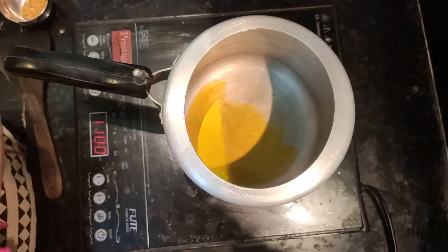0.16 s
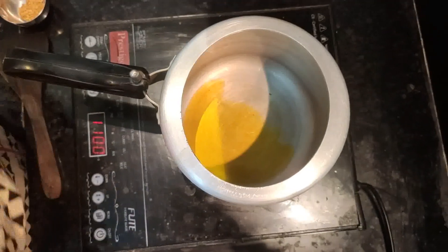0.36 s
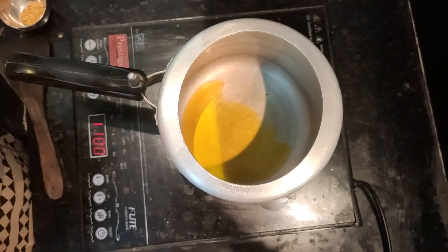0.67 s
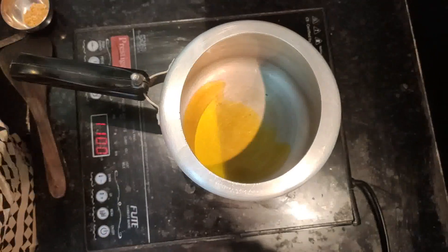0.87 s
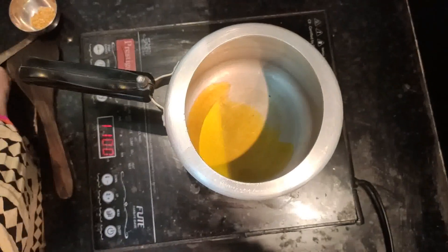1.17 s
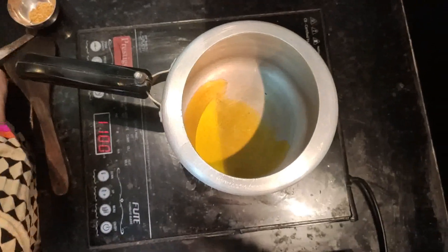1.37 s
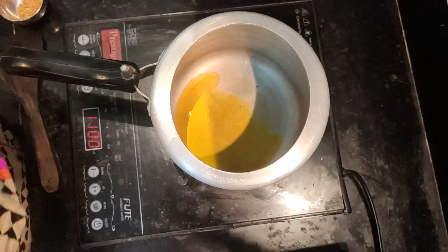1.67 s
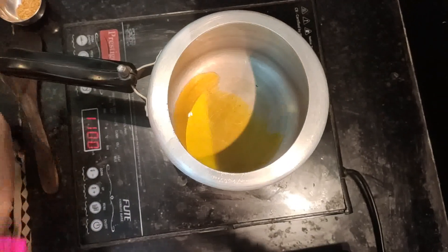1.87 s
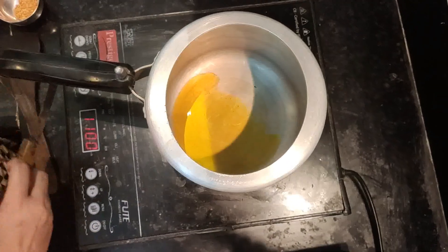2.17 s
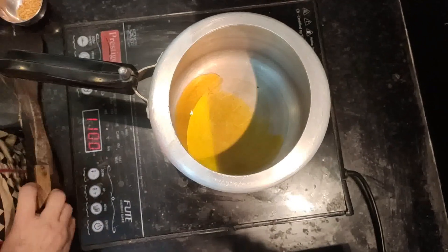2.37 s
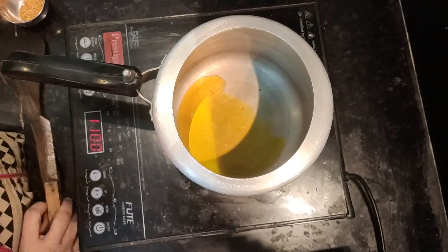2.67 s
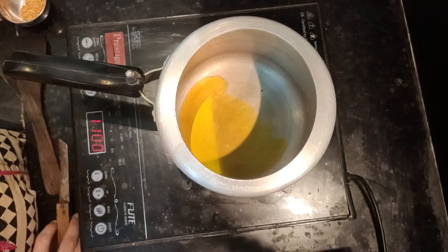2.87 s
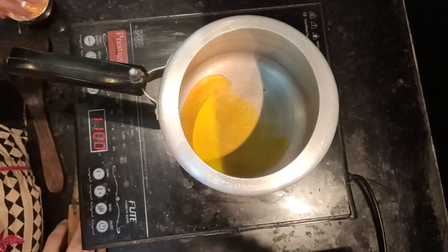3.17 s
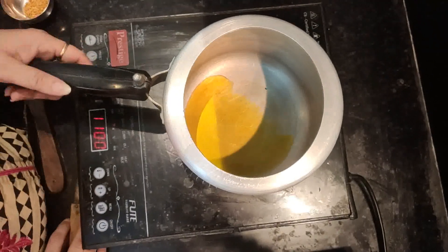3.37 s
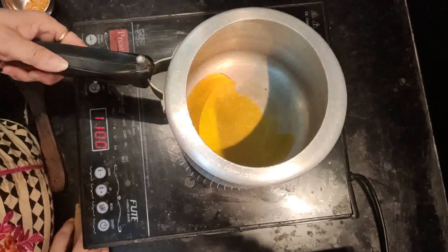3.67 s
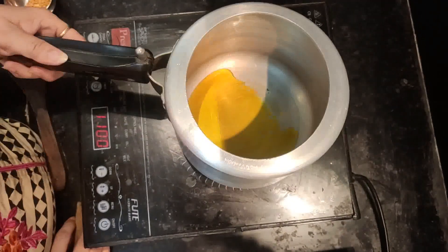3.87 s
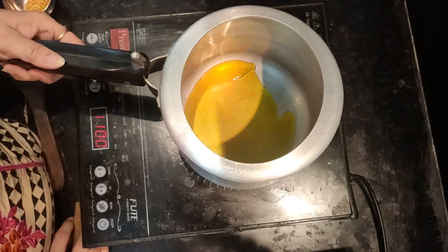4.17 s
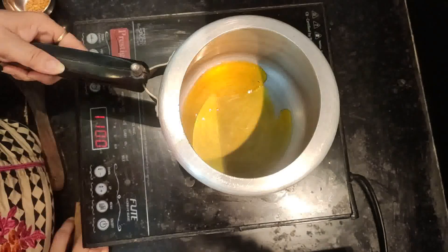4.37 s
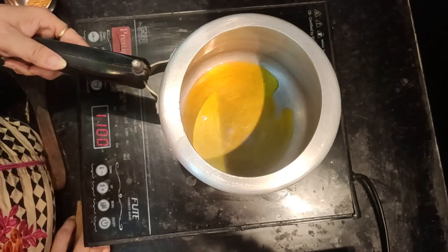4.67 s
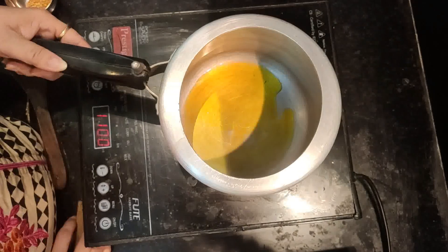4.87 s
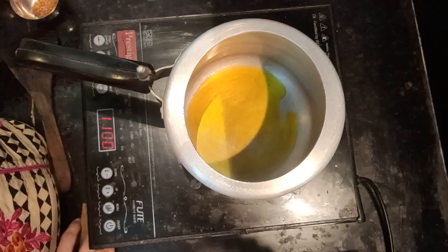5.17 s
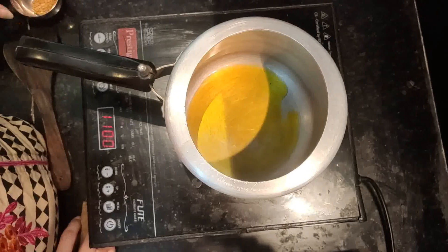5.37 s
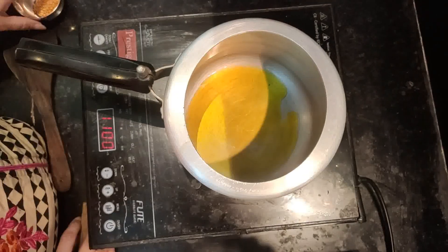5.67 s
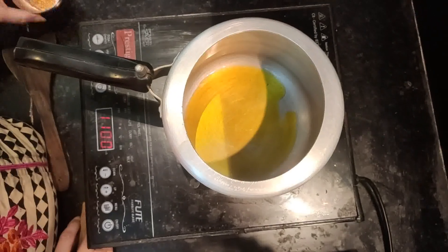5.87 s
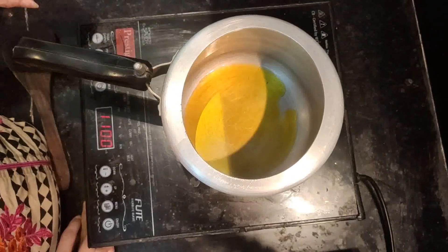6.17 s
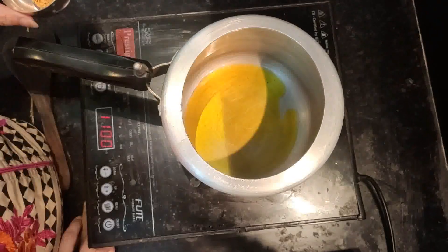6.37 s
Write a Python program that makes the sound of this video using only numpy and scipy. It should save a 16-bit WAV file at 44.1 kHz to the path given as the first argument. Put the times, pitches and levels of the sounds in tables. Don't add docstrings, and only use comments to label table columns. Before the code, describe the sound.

An induction cooktop runs throughout: rushing fan air, a steady low blade tone and slowly swelling hum, with faint high fizzing from the pot. A spoon taps near one second, a knife knocks hard at two, bangles clink at two and a half, then a ring taps. A hand rubs the handle, and the fizz stops while the pot is lifted. Close stereo pickup in a small hard kitchen.

```python
import sys
import numpy as np
from scipy import signal
from scipy.fft import rfft, irfft
from scipy.io import wavfile
from scipy.ndimage import uniform_filter1d

SR = 44100
rng = np.random.default_rng(int(sys.argv[2]) if len(sys.argv) > 2 else 0)


def dump(signal):
    limited = np.clip(np.atleast_2d(signal).T, -1, 1)
    pcm = np.round(limited * 32767).astype(np.int16)
    wavfile.write(sys.argv[1], SR, pcm)


def rack_gain(trim_db):
    fader = np.asarray(trim_db, float)
    return 10 ** (fader / 20)


N = 287973

# [f/Hz, likeness from 0 to 1]
LIKENESS = [(40, 0.74), (130, 0.97), (250, 0.92), (400, 0.98), (520, 0.47), (700, 0.41), (1310, 0.074),
            (2800, 0.073), (13000, 0)]


def evened(x):
    return x / np.sqrt(np.mean(x ** 2) + 1e-20)


def read(points, hz):
    f, value = np.transpose(points)
    return np.interp(np.log(hz + 1), np.log(f + 1), value)


def add(mix, s, sound):
    part = mix[:, round(s * SR):][:, :sound.shape[1]]
    part += sound[:, :part.shape[1]]


def wavering(t, db, top_hz):
    coarse = t[::441]
    waves = [np.sin(2 * np.pi * (f * coarse + rng.random())) / np.sqrt(f)
             for f in np.geomspace(.2, top_hz, num=24)]
    return rack_gain(db * np.interp(t, coarse, evened(sum(waves))))


def humps(modes, hz):
    return sum(rack_gain(db) ** 2 / (1 + (2 * (hz - f) / width) ** 2) for f, width, db in modes)


def alike(pair, hz):
    same = np.clip(read(LIKENESS, hz), -1, 1)
    return np.array([pair[0], same * pair[0] + np.sqrt(1 - same ** 2) * pair[1]])


def hiss(gain, same, patchy_db, size):
    # [f/Hz, left over right level/dB]
    lean_points = [(60, 0.5), (230, 2.5), (890, 0), (3420, 0.5), (13200, 1.5)]
    hz, frames = np.fft.rfftfreq(size, 1 / SR)[:, None], 4 * N // size + 5
    a, b, c, d, patches = rng.standard_normal((frames, len(hz), 5)).T
    patches = uniform_filter1d(patches, size=size // 100, axis=0)
    patches = evened(uniform_filter1d(patches, size=8, axis=1))
    left, lean = a + 1j * b, rack_gain(read(lean_points, hz) / 2)
    shift = np.exp(2j * np.pi * hz * 5 / SR)
    right = same * left * shift + np.sqrt(1 - same ** 2) * (c + 1j * d)
    spectra = np.array([left * lean, right / lean]) * gain * rack_gain(patchy_db * patches)
    return evened(signal.istft(spectra, nperseg=size, noverlap=3 * size // 4)[1][:, :N])


def kitchen(x):
    # [f/Hz, time to fall by 60 dB/s]
    fading = [(300, 0.24), (2000, 0.5), (6000, 0.37), (12000, 0.29)]
    taps = np.zeros((2, SR // 2))
    slots = np.arange(120, SR // 2 - 20, 20)
    at = slots + rng.integers(0, 20, (2, len(slots)))
    np.put_along_axis(taps, at, rng.choice([-1., 1.], at.shape), 1)
    hz, t, z = signal.stft(taps, SR, nperseg=256)
    hz = hz[:, None]
    tail = signal.istft(alike(z, hz) * rack_gain(-60 * t / read(fading, hz)), SR, nperseg=256)[1]
    return signal.fftconvolve(x.mean(0)[None], tail / np.linalg.norm(tail[0]), axes=1)[:, :N]


def hum():
    # [f/Hz, level/dB, wavering/dB]
    steady = [
        (20.5, -59, 3.5),
        (99.87, -54.3, .5),
    ]
    # [t/s, f/Hz]
    near_motor = [
        (0, 103.68),
        (3.4, 103.68),
        (3.9, 103.4),
        (4.7, 104.02),
        (6.53, 104.02),
    ]
    # [middle t/s, length/s, level/dB]
    swells = [
        (.35, 2.3, -54.5),
        (2.5, 2.2, -50),
        (3.5, 1.3, -49.5),
        (4.85, 2.0, -53),
        (6.55, 1.2, -58),
    ]
    t = np.arange(N) / SR
    throb = rack_gain(-63)
    for s, length, db in swells:
        throb = throb + rack_gain(db) * np.cos(np.pi * np.clip((t - s) / length, -.5, .5)) ** 2
    tones = throb * np.sin(2 * np.pi * 49.17 * t)
    turns = np.cumsum(np.interp(t, *np.transpose(near_motor))) / SR + .56
    tones += rack_gain(-59 + 0.11 * t) * np.cos(2 * np.pi * turns)
    for hz, db, waver_db in steady:
        tones += rack_gain(db) * wavering(t, waver_db, top_hz=2.37) * np.cos(2 * np.pi * hz * t)
    return np.sqrt(2) * tones * rack_gain(np.c_[[.9, -.9]])


def fan():
    # [t/s, f/Hz]
    blade_pitch = [
        (0, 281.63),
        (3.5, 281.63),
        (4.8, 281.57),
        (6.53, 281.44),
    ]
    # [multiple of the blade pitch, left level/dB, right level/dB, wavering/dB]
    blade_tones = [(1, -42.7, -44, .5), (2, -62, -66, 2.), (3, -67, -67, 2.), (4, -66, -63.5, 2.)]
    # [f/Hz, level/dB in each Hz]
    air = [(15, -6), (32, -12), (60, -11), (90, -8.5), (130, -13), (220, -23), (270, -5.5), (400, -10.5),
           (500, -17), (900, -13.5), (1500, -15), (2200, -18.5), (5000, -27.5), (12500, -39)]
    # [f/Hz, width/Hz, level over the rush/dB]
    housing = [(168, 4.5, 12), (192.5, 8, 12.5), (341, 10.7, 8.5), (431.6, 53, 9.5), (592, 20.6, 10.5),
               (737.4, 17.5, 7.5), (1016, 57, 7.5), (1353, 43, 9.5), (1920, 230, 1), (2500, 39, -27)]
    t, hz = np.arange(N) / SR, np.fft.rfftfreq(4096, 1 / SR)[:, None]
    gain = rack_gain(read(air, hz)) * np.sqrt(1 + humps(housing, hz))
    out = rack_gain(-41.5) * hiss(gain, np.clip(read(LIKENESS, hz), -1, 1), patchy_db=1.07, size=4096)
    turns = np.cumsum(np.interp(t, *np.transpose(blade_pitch))) / SR
    for k, left_db, right_db, waver_db in blade_tones:
        tone = np.sin(2 * np.pi * k * turns + np.c_[[0, .13]])
        out += np.sqrt(2) * rack_gain(np.c_[[left_db, right_db]]) * wavering(t, waver_db, top_hz=6.6) * tone
    return out


def pot():
    # [f/Hz, width/Hz, level/dB]
    parts = [
        [(11300, 210, -5), (11440, 490, -3), (12530, 580, 1)],
        [(4160, 890, 0), (5500, 1800, -27), (7100, 300, -1.5), (7530, 80, -0.5), (7840, 440, -2),
         (9000, 1300, -8.5)],
        [(10670, 510, 0), (9800, 1500, -6)],
    ]
    # [t/s, level/dB]
    coil = [
        (0, 2.5),
        (.9, 7),
        (1.4, 1.5),
        (3.4, 9),
        (3.9, -2.5),
        (4.04, 4),
        (5.03, 0),
        (5.85, -12),
        (6.53, -0.5),
    ]
    # [level at 0 dB coil power/dB, share of a power change followed, extra while rocking
    # (reversed at rest)/dB]
    coupling = [
        (-60, 0.68, -4.5),
        (-62.5, .4, -2),
        (-74.5, .3, 11.5),
    ]
    lift_s, set_s, switch_s, rock_s = 4.055, 5.015, 0.017, .65
    hz = np.fft.rfftfreq(1024, 1 / SR)[:, None]
    t = np.arange(4 * N // 1024 + 5) * 256 / SR
    coil_db = np.interp(t, *np.transpose(coil))
    lifted = np.clip(np.minimum(t - lift_s, set_s - t) / switch_s + .5, 0, 1)
    rocking = np.sin(np.pi * np.clip((t - set_s) / rock_s, 0, 1.5))
    power = 0
    for modes, (db, share, rock_db) in zip(parts, coupling):
        colour = humps(modes, hz)
        part_db = db + share * coil_db + rock_db * rocking - 24 * lifted
        power = power + colour / colour.sum() * rack_gain(2 * part_db)
    level = np.sqrt(power.sum(0).mean()) * rack_gain(2.5)
    return level * hiss(np.sqrt(power), 0.059, patchy_db=2.4, size=1024)


def rub():
    # [start t/s, length/s, level/dB]
    strokes = [
        (3.327, .2, -45),
        (3.44, 0.26, -50.5),
    ]
    late, slips_per_s, slip_db = 1.5, 700, 1.6
    hz, t = np.fft.rfftfreq(256, 1 / SR)[:, None], np.arange(N) / SR
    press = sum(rack_gain(db) * np.sin(np.pi * np.clip((t - s) / length, 0, 1) ** late) for s, length, db in strokes)
    slips = rack_gain(slip_db * np.minimum(rng.exponential(1, N), 3)) * (rng.random(N) < slips_per_s / SR)
    grain = evened(3 + signal.lfilter([1], [1, -np.exp(-1 / (.002 * SR))], slips))
    colour = humps([(5500, 8000, -3), (10000, 4500, -1)], hz)
    return press * grain * hiss(np.sqrt(colour), 0.19, patchy_db=1.5, size=256)


def blow(modes, body, db, lean_db, contact_s, rattle_db):
    t = np.arange(SR // 2) / SR
    hz = np.fft.rfftfreq(len(t), 1 / SR)
    colour = humps(body, hz) * hz ** 2 / (hz ** 2 + 300 ** 2)
    noise = alike(rfft(rng.standard_normal((2, len(t)))), hz)
    rattle = rack_gain(rattle_db) * evened(irfft(noise * colour)) * np.exp(-2 * t / max(contact_s, 1e-4))

    phases = np.pi * np.arange(len(modes))[:, None] + rng.uniform(.3, .7, (len(modes), 1)) * [0, np.pi]
    ring = 0
    for (f, mode_db, t60), phase in zip(modes, phases):
        build = 1 - np.exp(-(f * t / 1.4) ** 2)
        ring = ring + rack_gain(mode_db - 60 * t / t60) * build * np.sin(2 * np.pi * f * t + phase[:, None])
    ring = irfft(alike(rfft(ring), hz))

    rise = 1 - np.exp(-t / max(.12 * contact_s, 1e-5))
    gain = rack_gain(db + np.c_[[lean_db / 2, -lean_db / 2]]) * rise
    clap = np.roll(irfft(colour), int((contact_s / 4 + .001) * SR))
    clap *= rack_gain(rattle_db) * np.sqrt(SR * contact_s / 8) / np.linalg.norm(clap)
    return np.vstack([gain * (ring + rattle), gain * (rack_gain(-6) * ring + clap)])


def handling():
    # [f/Hz, level/dB, time to fall by 60 dB/s]
    knife = [(375, -0.5, 0.064), (707, -4, 0.029), (953, -11, 0.033), (4940, -15, 0.083), (7100, -21, 0.2)]
    bangle = [(3952, -20, .08), (4250, -5, .065), (4360, 1, .08), (4430, -15, .34), (4485, -10, .1),
              (8215, -20, .36), (8302, -8, .11), (8420, -11, .08)]
    finger_ring = [(4880, -4, .07), (4947, -7, .3), (6100, -7, .03), (7935, -7, .24), (8050, -6, .06),
                   (9168, -7, .03), (10840, -3, .05)]
    spoon = [(3700, -4, .12), (3721, -4, .12), (8780, -3, .06), (8880, 0, .06), (9421, -5, .05),
             (10920, -5, .05), (11620, -8, .04), (1700, -14, .1), (2250, -13, .1)]
    # [f/Hz, width/Hz, level/dB]
    bodies = [
        [(408, 300, 2), (795, 450, -0.5), (3120, 980, -2), (3900, 1500, -1), (6600, 2100, -1),
         (9800, 2100, -1.5), (11300, 1300, -2.5)],
        [(497, 750, 5), (1800, 740, 6), (3320, 1600, 2.5), (4360, 300, 10), (6700, 900, -6), (8600, 1600, 0.5),
         (11700, 1300, -4.5)],
        [(2390, 1100, -3), (4940, 1700, 1), (8000, 1500, -0.5), (10500, 3000, 0.5)],
        [(2080, 2100, 1), (5600, 2500, -3), (9000, 690, 7), (11000, 1500, 3)],
    ]
    # [t/s, level/dB, left over right/dB, contact rattle/s, rattle level/dB]
    knife_blows = [
        (2.0378, -12, -1, 0.0061, 6.5),
        (2.042, -26.5, 9, 0.011, 11),
        (2.087, -43, 17, .02, -2),
    ]
    bangle_blows = [
        (2.603, -12, 1.8, 0.054, -8),
        (2.662, -30, 2.9, 0.072, -8),
    ]
    ring_blows = [
        (3.052, -54, -2, .02, 12),
        (3.060, -43, -1.8, 0.035, 12),
        (3.0745, -28, -1.3, 0.023, 4.3),
    ]
    spoon_blows = [
        (1.019, -32, -1, 0.021, 6),
        (1.026, -40, -1, 0.048, 2),
        (1.082, -42, -1, .01, -14),
    ]
    # [t/s, level/dB, left over right/dB, lower f/Hz, upper f/Hz]
    clinks = [(0.861, -41, 7, 7200, 10500), (.866, -40.5, 2, 5080, 11100), (0.920, -45, 5, 7100, 9300),
              (1.37, -52, 1, 8200, 9800), (2.824, -48, 9, 8330, 8450), (2.869, -51, 2, 8000, 9000),
              (3.503, -48, 2, 6240, 9500), (4.0223, -39.5, 5, 3900, 7500)]
    # [t/s, level/dB, left over right/dB, lower f/Hz, upper f/Hz]
    snaps = [(1.106, -49, 1, 4620, 5300), (3.615, -58, 0, 4700, 5170), (.849, -53, 5, 10300, 10600),
             (3.3956, -43.5, 2, 5260, 9790), (3.396, -44.5, 4, 7350, 11200), (3.446, -58, 4, 8600, 10200),
             (3.4556, -42, -2, 5050, 7600), (3.469, -46, -2, 8600, 10000), (3.595, -56, 0, 7040, 10500),
             (4.023, -62, 0, 9000, 11800), (4.6687, -59, .5, 8840, 11800), (5.0148, -45.5, 3, 3840, 11300),
             (5.017, -49, 2, 5200, 7300), (5.079, -60, 3, 7800, 11000)]
    out = np.zeros((4, N))
    things = (knife, bangle, finger_ring, spoon)
    for modes, body, blows in zip(things, bodies, (knife_blows, bangle_blows, ring_blows, spoon_blows)):
        for s, *how in blows:
            add(out, s, blow(modes, body, *how))
    for ticks, contact_s, rattle_db in [(clinks, 0.016, -2), (snaps, 0.0095, 9.5)]:
        for s, db, lean_db, low_hz, high_hz in ticks:
            modes = [(low_hz, -2, .035), (high_hz, -1, .03)]
            body = [(low_hz, 900, 0), (high_hz, 1400, 0), (7500, 8000, -3)]
            add(out, s, blow(modes, body, db + 4.5, lean_db, contact_s, rattle_db))
    return out


def scene():
    sounds = handling() + np.tile(rub(), (2, 1))
    no_bass = signal.butter(2, 170, "high", fs=SR, output="sos")
    near = signal.sosfilt(no_bass, sounds)
    return near[:2] + rack_gain(-4.0) * kitchen(near[2:]) + fan() + hum() + pot()


def low_pass(x):
    return signal.sosfilt(signal.butter(12, 13760, fs=SR, output="sos"), x)


def record(dry):
    edge = signal.firwin(601, 12480, window=("kaiser", 7), fs=SR)
    mix = signal.oaconvolve(dry, edge[None], "same")
    return low_pass(mix)


dry = scene()
out = record(dry)
dump(out)
```